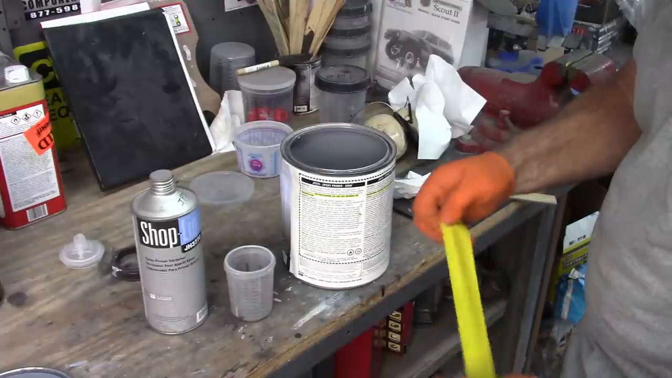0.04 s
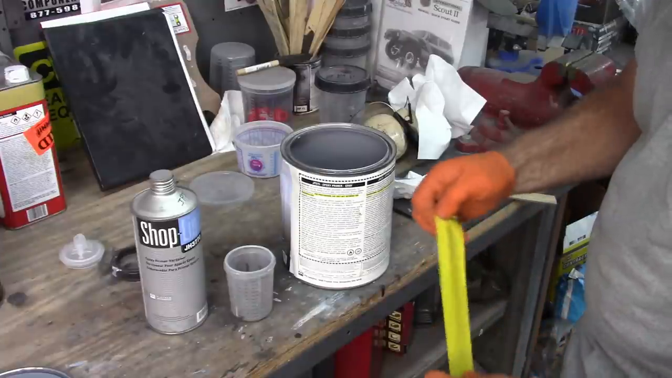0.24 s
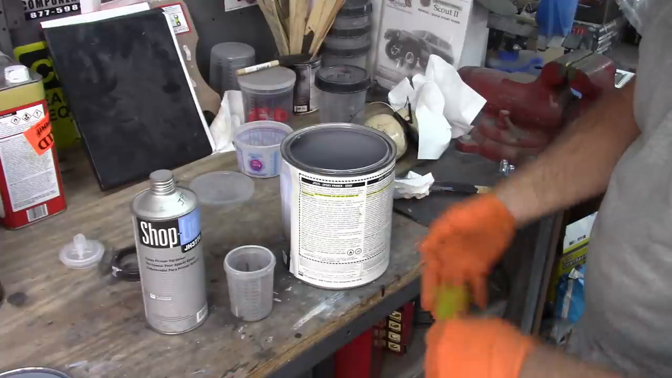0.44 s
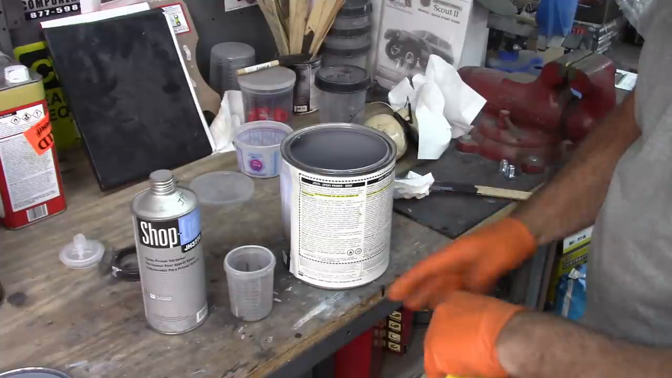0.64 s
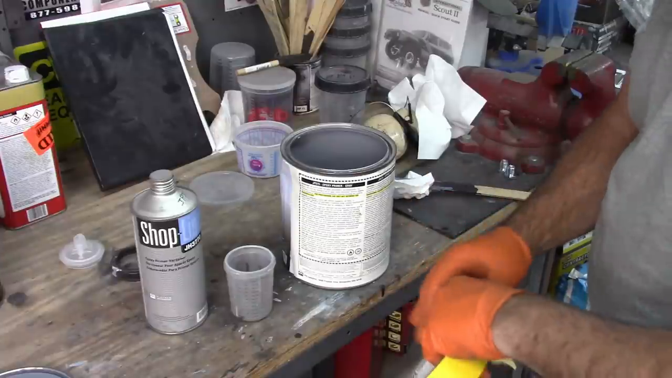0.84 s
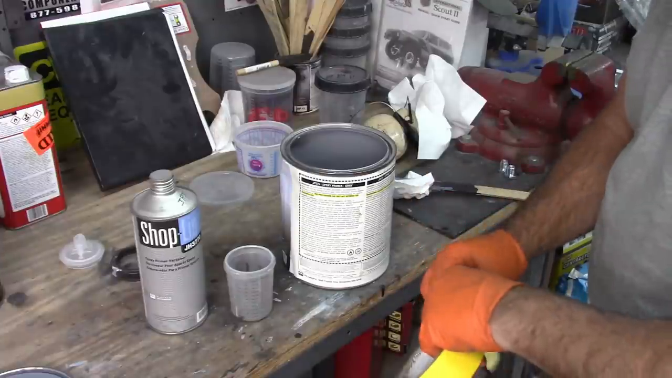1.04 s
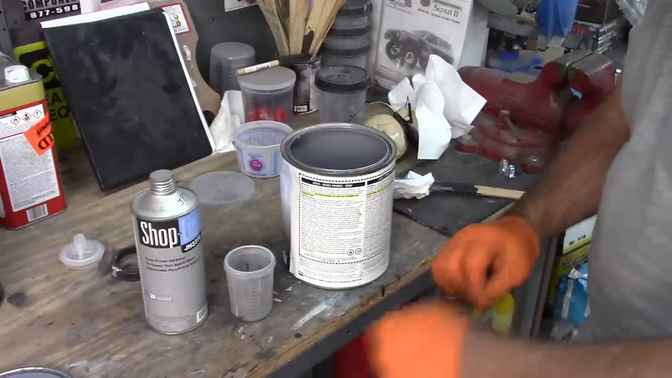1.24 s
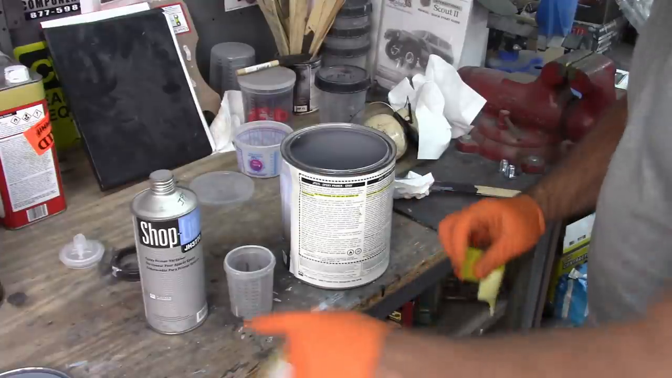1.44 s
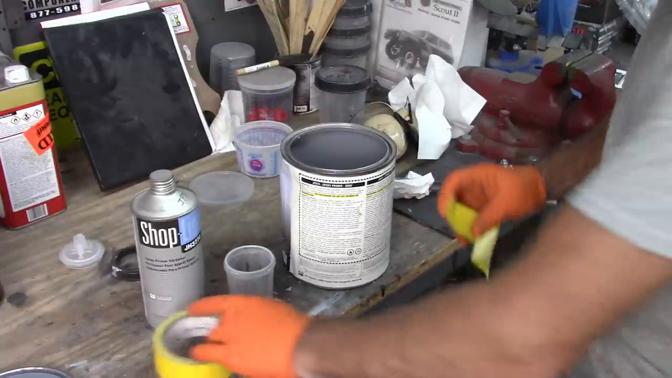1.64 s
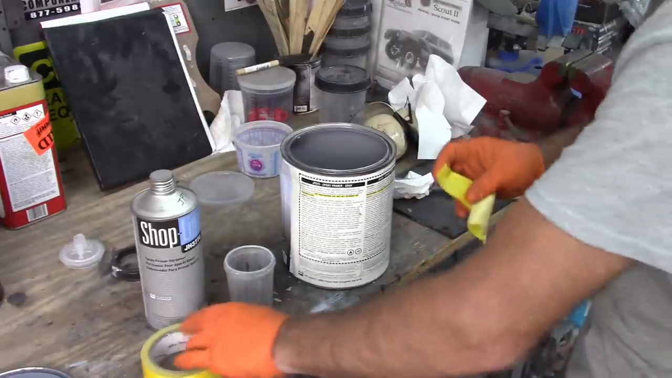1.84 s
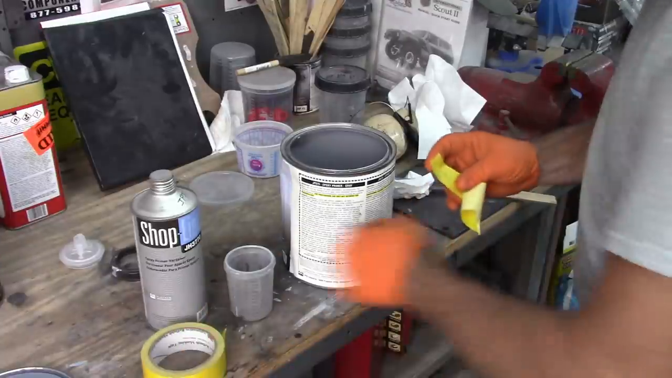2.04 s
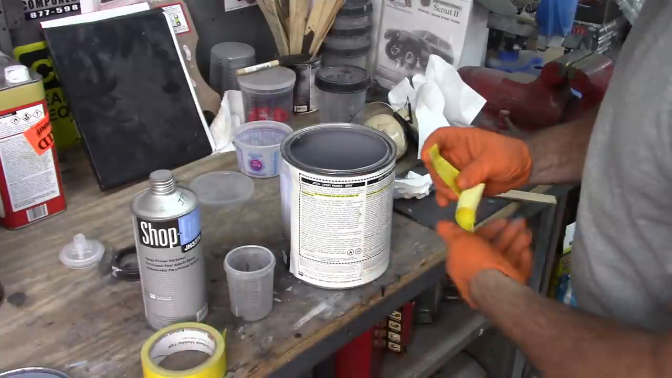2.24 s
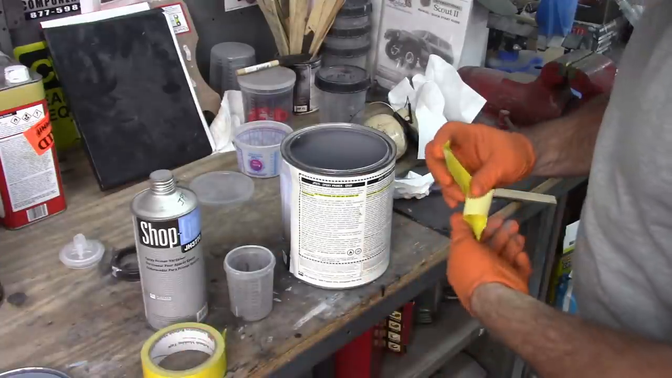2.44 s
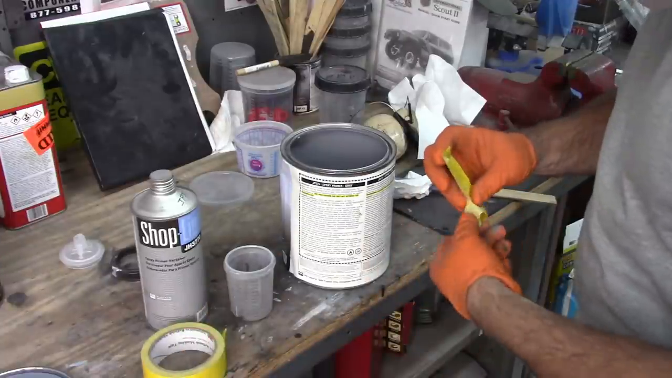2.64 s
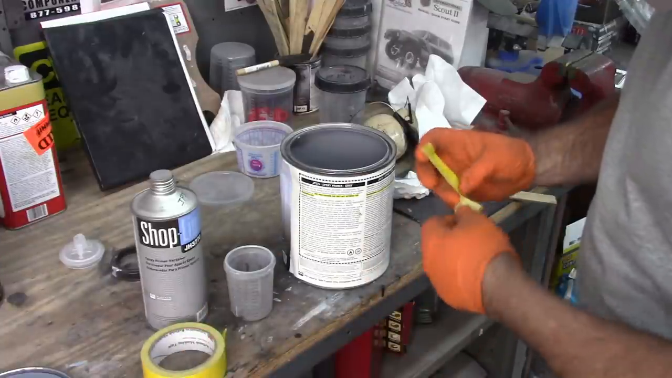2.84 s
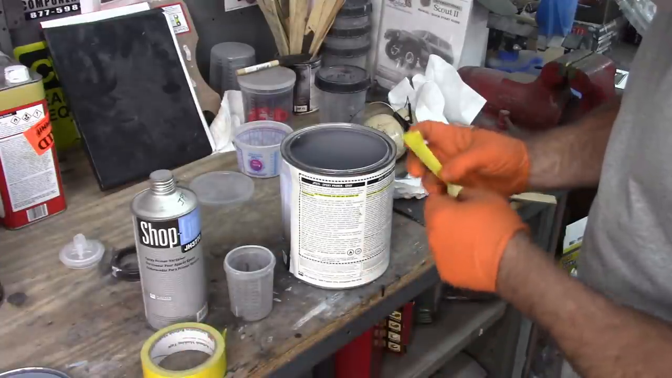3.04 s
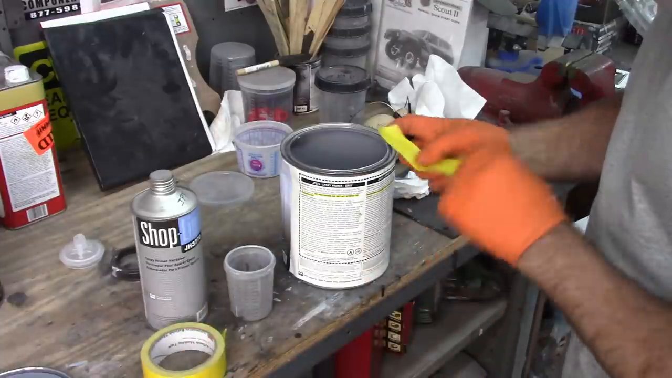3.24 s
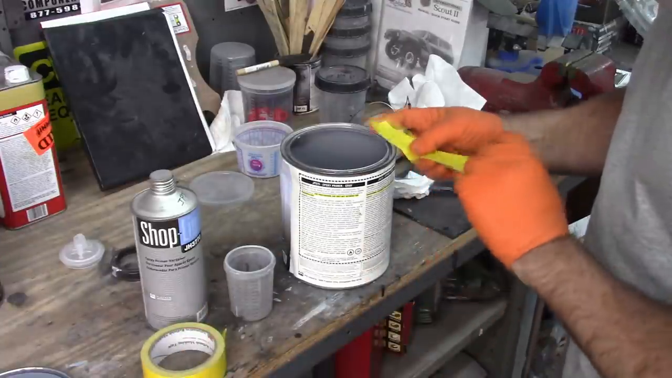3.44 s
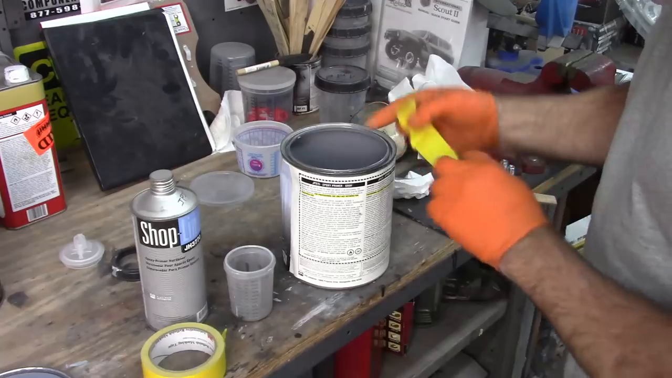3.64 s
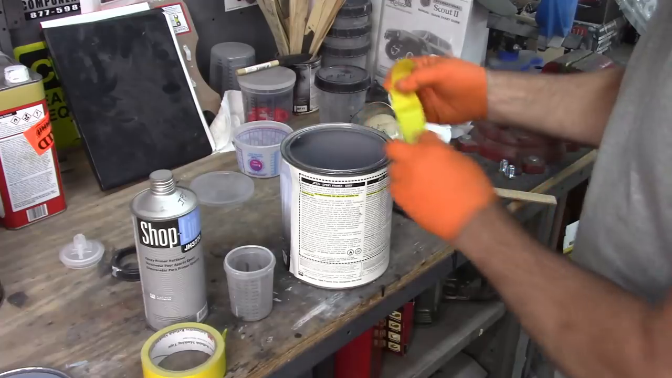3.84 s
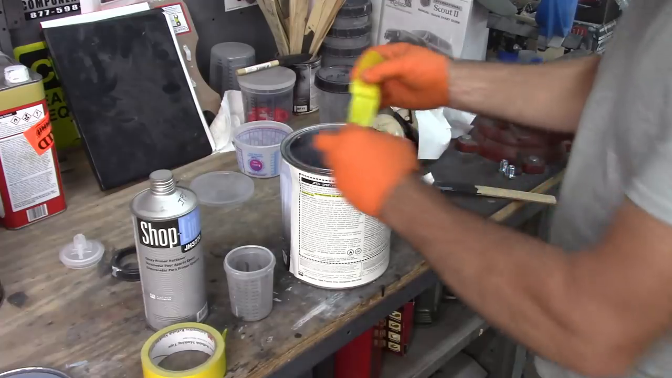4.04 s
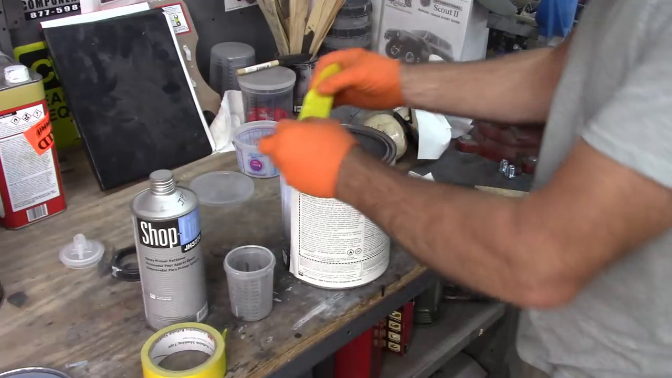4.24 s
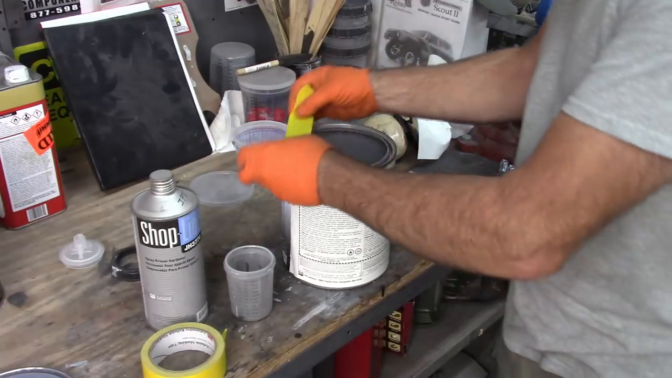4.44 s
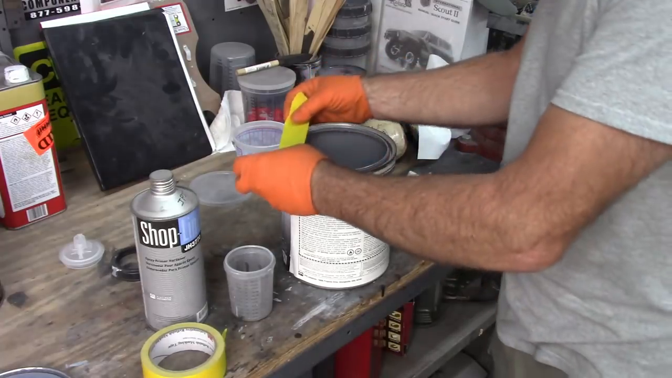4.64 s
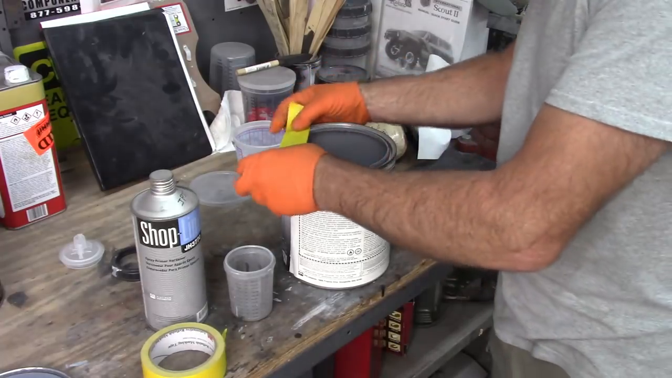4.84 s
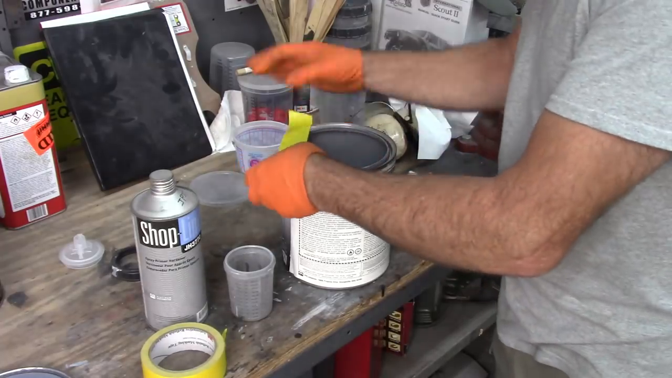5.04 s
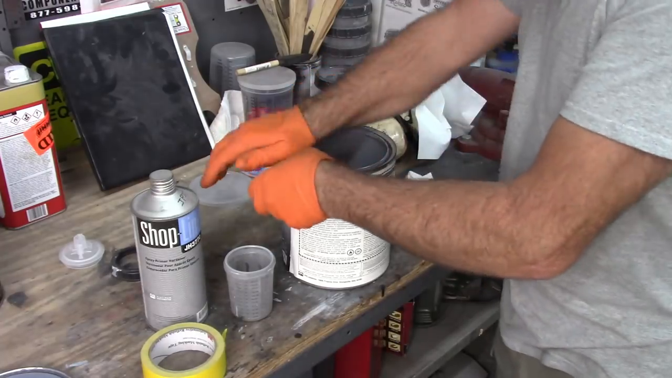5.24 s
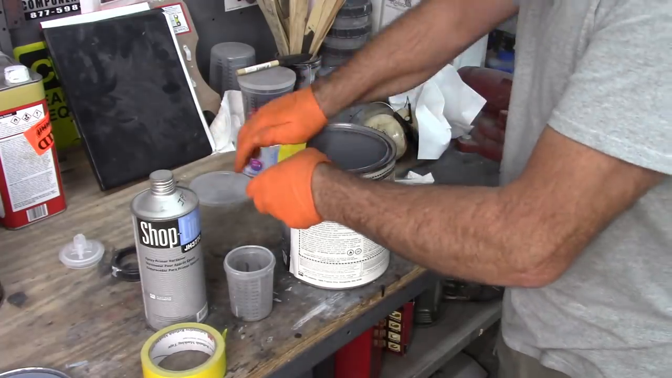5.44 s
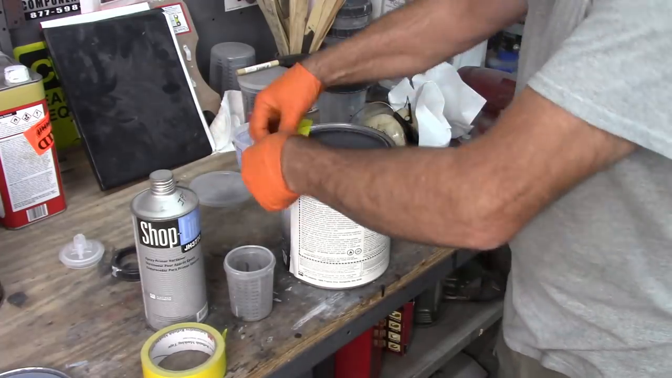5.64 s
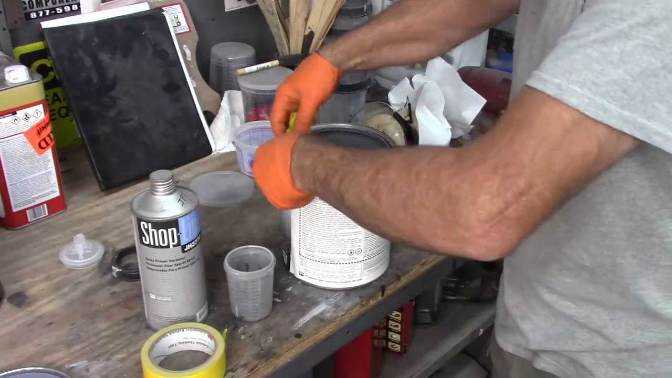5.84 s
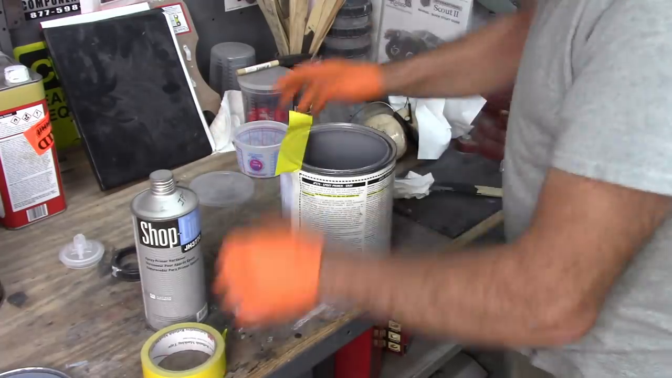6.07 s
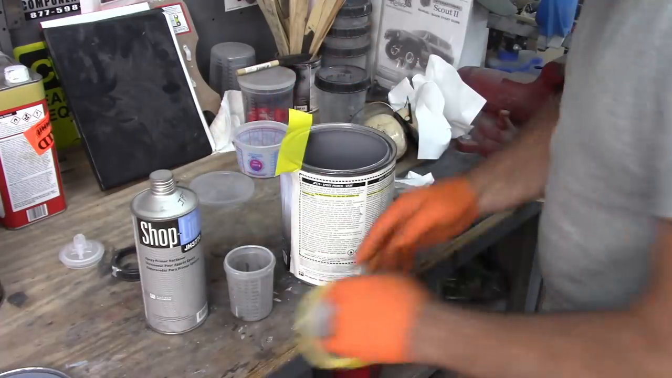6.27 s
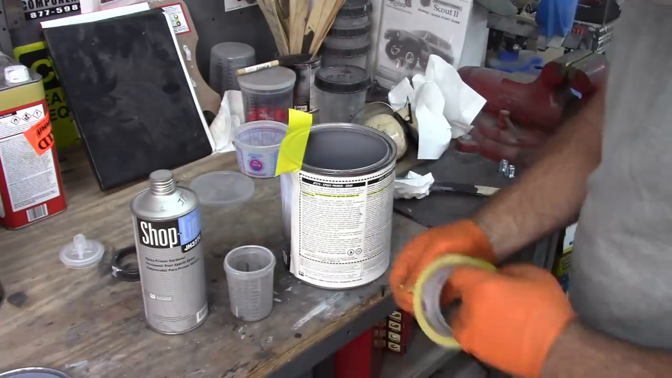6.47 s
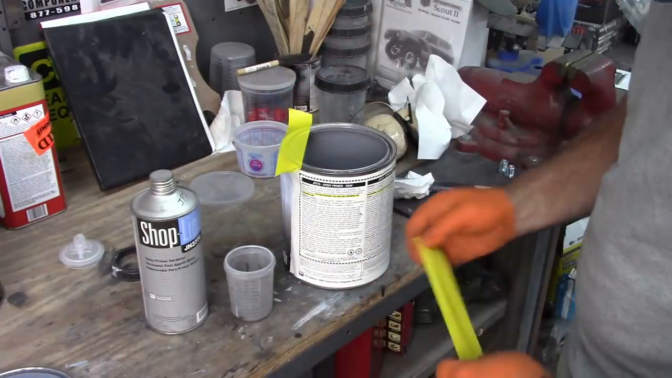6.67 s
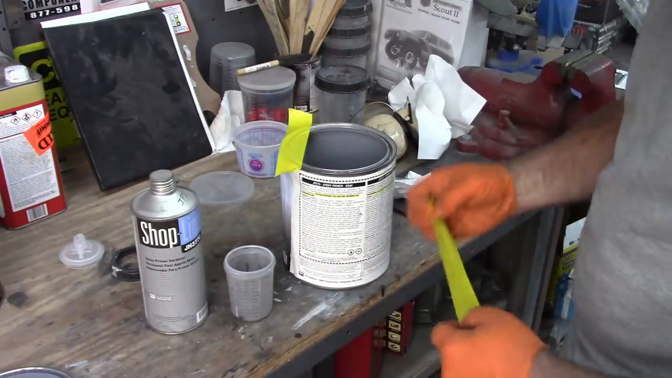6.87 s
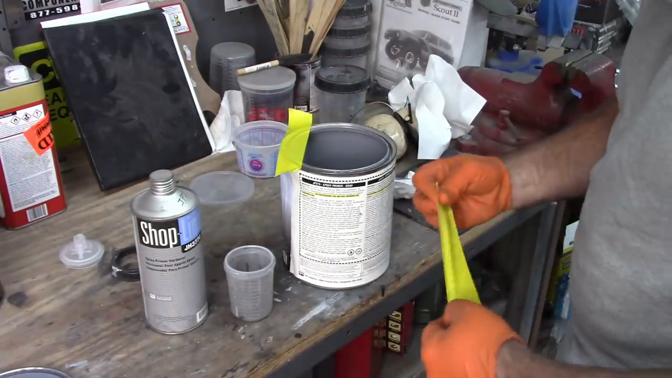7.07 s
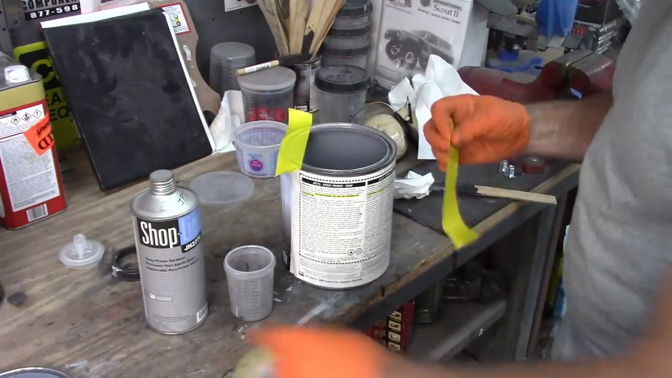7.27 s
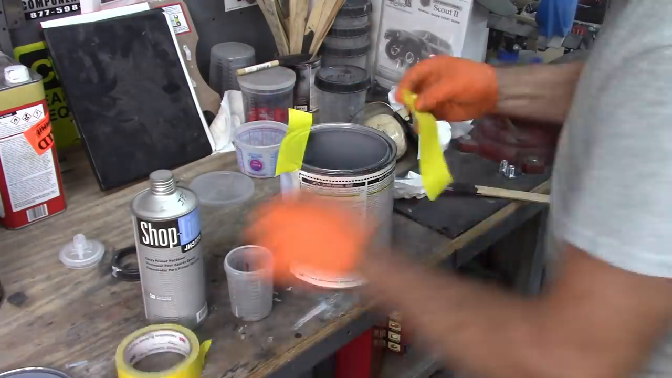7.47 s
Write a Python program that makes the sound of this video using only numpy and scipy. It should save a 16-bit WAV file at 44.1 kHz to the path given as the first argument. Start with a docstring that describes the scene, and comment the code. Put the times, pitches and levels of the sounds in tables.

```python
"""Masking tape at a garage workbench, heard close up in a small cluttered room over a faint hush.
Strips are jerked off the roll in stick-slip noise that drums and rasps; the roll knocks on the wooden top.
Before and after the knock, gloved fingers crinkle a strip and rub it onto a paint can: crease clicks,
friction grains and rustle. The nearly mono image turns wide all at once near 4.8 s; a few short pulls and
tears follow, and at the end the roll knocks again, softly."""
import sys
import numpy as np
from scipy import signal
from scipy.fft import rfft, irfft, next_fast_len
from scipy.io import wavfile
from scipy.ndimage import uniform_filter1d, minimum_filter1d, map_coordinates

SR = 44100
rng = np.random.default_rng(int(sys.argv[2]) if len(sys.argv) > 2 else 0)


def wrap_up_sound(samples):
    """Save the sound to the file named by the first command line argument, as 16-bit audio."""
    columns = np.atleast_2d(samples).T
    # keep every value between -1 and 1, then stretch to whole-number steps
    tamed = np.clip(columns, -1, 1)
    steps = np.round(tamed * 32767).astype(np.int16)
    wavfile.write(sys.argv[1], SR, steps)


N = 331191  # length in samples

# The paper backing buckles: start_s, relative level_db, crumple_s, knock_db (low end), treble_db
BUCKLES = [(0.46, -15, 0.018, -6.5, -1.5), (1.19, -20, 0.038, -0.5, -6), (1.421, -19.5, 0.019, -8, 0.5),
           (1.465, -27, 0.0042, 1, -4.5), (2.043, -30, .01, -8, -6.5), (2.097, -27.5, .01, -18, -8),
           (2.411, -35.5, 0.01, -9.5, 9), (2.442, -24.5, 0.0063, 0.5, 6), (2.447, -20, 0.022, 3, -2.5),
           (2.684, -26.5, 0.0065, 7, -5), (2.836, -22.5, 0.027, -3, -2), (2.973, -19, 0.021, -3, 3),
           (3.102, -12, 0.02, -9, 0.5), (3.233, -32.5, 0.0068, -7, -5), (3.26, -32, .022, -1.5, -2.5),
           (3.474, -9.5, 0.013, -13, -2.5), (3.598, -35, .012, -22, 8), (3.628, -30.5, 0.014, -15, 6),
           (3.818, -42, .012, -10, 3), (3.943, -39.5, 0.019, 13, 3), (4.08, -29, .025, 3.5, 1.5),
           (4.19, -35, 0.012, 3, -2.5), (5.018, -40, 0.013, 10, 3), (6.841, -18.5, 0.0069, 10.5, -6),
           (7.387, -21.5, 0.009, -15, -4.5)]
# Spectrum of sliding paper: freq_hz, relative density_db per Hz
SLIDING_PAPER = [(150, -39), (250, -8), (451, -2), (565, -4), (1190, -4), (1350, -0.5), (1660, -1.5),
                 (3200, -2), (5030, -11), (5780, -4.5), (6750, -4), (10600, -10.5), (14500, -25.5),
                 (15800, -34)]


def amp(db):
    """Decibels to gain."""
    return 10 ** (np.asarray(db) / 20)


def unit(x):
    """Scale to rms 1."""
    return x / np.sqrt(np.mean(x ** 2) + 1e-20)


def along(points, hz):
    """Read (Hz, value) points on a log frequency axis."""
    f, v = np.transpose(points)
    return np.interp(np.log(hz + 1), np.log(f + 1), v)


def curve(rows):
    """Turn (s, value) rows into one value per sample."""
    return np.interp(np.arange(N) / SR, *np.transpose(rows))


def wobble(rate, size):
    """A smooth random curve with rate knots a second."""
    return map_coordinates(rng.standard_normal(2048), [np.arange(size) * rate / SR], mode="wrap")


def colour(x, gain_db):
    """Causal minimum-phase filter whose gain in dB is a function of frequency."""
    n = x.shape[-1]
    m = 2 * next_fast_len(n // 2 + 2048)
    cepstrum = irfft(np.log(amp(gain_db(np.fft.rfftfreq(m, 1 / SR))) + 1e-6))
    # folding the cepstrum forward makes the filter causal
    cepstrum[1:m // 2] *= 2
    cepstrum[m // 2 + 1:] = 0
    return irfft(rfft(x, m) * np.exp(rfft(cepstrum)), m)[..., :n]


def peak(hz, centre_hz, q):
    """Bell of a resonance, 1 at its centre."""
    return 1 / (1 + (q * (hz / centre_hz - centre_hz / (hz + 1))) ** 2)


def shelf(hz, edge_hz):
    """0 well below the edge, 1 well above."""
    return hz ** 4 / (hz ** 4 + edge_hz ** 4)


def crackle(spread_db, size):
    """Dense micro-snaps of very unequal size, rms 1."""
    sizes_db = spread_db * np.clip(rng.standard_normal(size), -3, 3)
    return unit(rng.standard_normal(size) * amp(sizes_db))


def stroke(t, hold, rise, fall):
    """Gain of a hand movement: 20 dB up over rise, held, 20 dB down over fall."""
    before = np.maximum(-t, 0) / rise
    after = np.maximum(t - hold, 0) / fall
    return amp(-20 * (before + after))


def add(track, s, sound):
    """Mix a sound into the track from time s on."""
    start = round(s * SR)
    part = sound[max(-start, 0):max(N - start, 0)]
    track[max(start, 0):][:len(part)] += part


def rips(jitter=.25, size_db=2.5, ripple_db=4.0, drum_q=5):
    """Glue threads snap in stick-slip bursts; the taut strip rings evenly and drums at its lowest mode."""
    # pulls and tears: start_s, hold_s, level_db, strip_hz (ripple spacing), drum_hz, drum_db (re rasp)
    pulls = [(.002, 0.061, -16, 587, 248, -15), (0.184, 0.038, -39.5, 513, 171, -10),
             (1.209, 0.022, -28, 810, 350, -21.5), (6.614, .024, -19, 1198, 340, -15),
             (6.731, .014, -20, 690, 254, -13.5), (6.833, 0.0086, -26, 585, 261, -21),
             (7.217, .010, -29, 1110, 345, -23.5)]
    # spectrum of snapping glue: freq_hz, relative density_db per Hz
    peel = [(59, -41.5), (100, -23), (271, -8.5), (732, -5.5), (886, -10.5), (1190, -2), (1470, -7),
            (1900, -1.5), (2670, -4), (3740, -9.5), (4720, -16.5), (6090, -7.5), (6920, -8.5), (8550, -7.5),
            (15800, -30)]
    rise_s, fall_s, ease = .006, .013, .45  # ease: share of the hold added to both ramps
    slip_rate_hz, slip_slows_s = 367.8, 0.057  # a long pull slips more slowly
    jerky_s = 0.072  # a pull held this long is fully jerky
    gentle_db, gentle_treble = -21, 0.06  # below this level a pull gains treble, dB per dB
    sag_per_s, drum_lag_s = 3.8, 0.0091  # the drum builds a little late
    bass_edge = .68  # below this share of its drum pitch the strip radiates little
    body_hz, body_base_db, body_db_per_s = 950, -4, 86.5  # a longer pull has more middle range

    out, t = np.zeros(N), np.arange(-SR // 10, SR // 5) / SR
    for s, hold, db, strip_hz, drum_hz, drum_db in pulls:
        rise, fall = rise_s + ease * hold, fall_s + ease * hold

        # each slip starts a burst of its own size, which dies away before the next
        slip_hz = slip_rate_hz * np.exp(-hold / slip_slows_s)
        slips = np.cumsum(slip_hz * np.exp(jitter * wobble(200, size=len(t)))) / SR
        sizes = amp(size_db * rng.standard_normal(512))[slips.astype(int) % 512]
        bursts = unit(sizes * np.exp(-(slips % 1) / .24))
        jerky = np.clip(hold / jerky_s, 0, 1)
        threads = crackle(spread_db=2.5, size=len(t)) * np.sqrt(jerky * bursts ** 2 + 1 - jerky)

        treble_db = gentle_treble * (gentle_db - db)
        body_db = body_base_db + body_db_per_s * hold
        ripple = lambda hz: ripple_db * np.cos(2 * np.pi * hz / strip_hz) * (1 - shelf(hz, edge_hz=1500))
        bass_cut = lambda hz: 20 * np.log10(shelf(hz, bass_edge * drum_hz) + .08)
        tone = lambda hz: (along(peel, hz) + ripple(hz) + body_db * peak(hz, body_hz, q=1.3)
                           + bass_cut(hz) + treble_db * shelf(hz, edge_hz=2500))
        rasp = unit(colour(threads, tone))

        drum = unit(colour(threads, lambda hz: 20 * np.log10(peak(hz, drum_hz, drum_q) + 1e-6)))
        # the pitch sinks as the strip lengthens: the drum is read ever more slowly
        read_s = hold + (1 - np.exp(-sag_per_s * (t - hold))) / sag_per_s
        drum = np.interp(read_s, t, drum)

        pull = rasp * stroke(t, hold, rise, fall)
        pull = pull + amp(drum_db) * drum * stroke(t - drum_lag_s, hold, rise, fall)
        add(out, s + t[0], amp(db) * pull)
    return out


def snaps(rise=0.0031, level_db=-22, click_db=-1):
    """A crease strains, flips with a click and crumples briefly, ringing at its own pitch."""
    # spectrum of creasing paper: freq_hz, relative density_db per Hz
    crease = [(88, -55), (150, -18.5), (713, -3), (1280, -9), (1620, -3.5), (2390, -6.5), (2790, -6.5),
              (3590, -2.5), (4540, -10), (5410, -7), (6700, -0.5), (13000, -19.5), (15800, -28.5)]
    out, t = np.zeros(N), np.arange(SR // 12) / SR
    click = np.arange(len(t)) == round(rise * SR)
    for s, db, length, knock_db, treble_db in BUCKLES:
        # a crisper crease rings higher, and less clearly
        crease_hz = 3100 + 68.5 * treble_db
        crease_db = 3 - 2.1 * treble_db
        crumple = crackle(spread_db=4.0, size=len(t)) * stroke(t - rise, 0, rise, max(length, .001))
        flip = crumple / np.linalg.norm(crumple) + amp(click_db) * click
        tone = lambda hz: (along(crease, hz) + crease_db * peak(hz, crease_hz, q=4)
                           + knock_db * (1 - shelf(hz, edge_hz=1600)) + treble_db * shelf(hz, edge_hz=2700))
        add(out, s, amp(db + level_db) * unit(colour(flip, tone)))
    return out


def rubs(ripple_db=3, drag_treble_db=-2):
    """Fine friction grains of sliding strokes and of drag around crisp snaps; each grip colours them anew."""
    # tape and gloves slide, on each other and on the can: start_s, hold_s, level_db, treble_db
    strokes = [(0.277, 0.0084, -52.5, 5), (.425, 0.036, -43, -5.5), (0.704, 0.0091, -56.5, -3),
               (1.041, 0.066, -58.5, -8), (1.24, .04, -47.5, -5.5), (1.539, 0.024, -45, 3),
               (2.649, 0.0065, -44.5, -7), (3.27, 0.091, -47.5, -3), (3.678, 0.04, -47, 0),
               (4.33, 0.022, -49, 2.5), (4.898, 0.0097, -43, 2), (5.048, 0.0062, -49, 10),
               (5.343, 0.035, -59, -8), (5.409, 0.058, -50.5, -7), (5.601, 0.0097, -58.5, -6),
               (5.766, 0.027, -54, -10.5), (6.07, 0.023, -59.5, -7), (6.322, 0.026, -65.5, 6.5),
               (6.533, 0.043, -47.5, -0.5), (6.995, 0.0095, -52, -14.5), (7.383, .015, -47.5, 0.5),
               (7.481, 0.0045, -34.5, -15)]
    rise_s, fall_s, ease = 0.0085, .018, 0.46  # ease: share of the hold added to both ramps
    drag_db, drag_grows = -30.5, 0.8  # level beside a snap of 0 dB, and its growth in dB per dB
    drag_rise_s, drag_fall_s = 0.048, 0.039
    crisp_db = -5  # snaps with no more treble than this come without drag

    out, t = np.zeros(N), np.arange(-SR // 4, SR // 4) / SR
    slides = [(s, hold, db, rise_s + ease * hold, fall_s + ease * hold, treble_db)
              for s, hold, db, treble_db in strokes]
    drags = [(s, 0, drag_db + drag_grows * db, drag_rise_s, drag_fall_s, drag_treble_db)
             for s, db, *_, treble_db in BUCKLES if treble_db > crisp_db]
    for s, hold, db, rise, fall, treble_db in slides + drags:
        grip_hz = rng.uniform(1400, 3400)  # spacing of the ripples in the spectrum
        grains = crackle(spread_db=6, size=len(t)) * amp(2.5 * wobble(220, size=len(t)))
        ripple = lambda hz: ripple_db * np.cos(2 * np.pi * hz / grip_hz) * shelf(hz, edge_hz=965)
        tone = lambda hz: along(SLIDING_PAPER, hz) + treble_db * shelf(hz, edge_hz=3400) + ripple(hz)
        friction = unit(colour(grains, tone))
        add(out, s + t[0], amp(db) * friction * stroke(t, hold, rise, fall))
    return out


def rustle(level_db=-2, paper_hz=3000, paper_db=5, thin_db=-8, crinkle_hz=110, crinkle_db=-5.0,
           body_swing_db=4.0, edge_swing_db=4.0):
    """Handled crepe paper whispers in clumps with tiny crinkles; body and crisp edge swell separately."""
    # the strip in the fingers: time_s, relative level_db
    handling = [(0.3, -55), (0.72, -64.5), (1.1, -72), (1.38, -45), (1.6, -62), (2.02, -59.5), (2.3, -62),
                (3.51, -50), (3.59, -50), (3.73, -58.5), (4.95, -76), (6.41, -69), (6.54, -58), (6.72, -75),
                (6.96, -84), (7.22, -73), (7.38, -58.5), (7.5, -74.5)]
    whisper = unit(crackle(spread_db=5, size=N) * amp(2 * wobble(70, size=N)))
    # sparse random clicks, crinkle_hz a second on average
    crinkles = unit((rng.random(N) < crinkle_hz / SR) * rng.standard_normal(N))
    tone = lambda hz: (along(SLIDING_PAPER, hz) + paper_db * peak(hz, paper_hz, q=1.4)
                       + thin_db * (1 - shelf(hz, edge_hz=2200)))
    paper = unit(colour(whisper + amp(crinkle_db) * crinkles, tone))
    body = signal.sosfiltfilt(signal.butter(2, 4800, fs=SR, output="sos"), paper)
    edge = paper - body
    body = body * amp(body_swing_db * wobble(7.9, size=N))
    edge = edge * amp(edge_swing_db * wobble(21, size=N))
    return amp(level_db + curve(handling)) * (body + edge)


def knocks(thud_t60=0.047, thud_db=-23, ring_db=-21):
    """The cardboard core hits the wood: a dull thud, and roll and bench ring briefly in decaying modes."""
    # the roll meets the bench and rocks: start_s, relative level_db
    hits = [(1.7536, -2.5), (1.759, -15.5), (1.777, -17), (1.790, -24.5), (1.803, -22), (1.814, -23.5),
            (7.483, -25), (7.494, -18.5)]
    # modes of roll and bench top: freq_hz, relative level_db, t60_s
    modes = [(234, -14.5, 0.12), (357, -7, 0.051), (562.6, -4, 0.044), (690, 3.5, .05), (888, 2.5, 0.046),
             (997.6, 2, 0.074), (1324, 6, 0.02), (1614, 4, 0.03), (2176, -11, 0.027), (2520, -10, 0.035),
             (3202, -16, 0.027)]
    # spectrum of the thud: freq_hz, relative density_db per Hz
    thud_spectrum = [(35, -55), (60, -24), (448, -2), (648, -2.5), (1330, -4), (1630, -4.5), (1920, -6),
                     (2420, -15.5), (2780, -20.5), (3340, -21.5), (4620, -41), (6530, -36), (15000, -69)]
    out, t = np.zeros(N), np.arange(SR // 2) / SR
    for s, db in hits:
        ring = np.zeros(len(t))
        for k, (hz, level, t60) in enumerate(modes):
            fade = amp(level + rng.normal(0, 0.5) - 60 * t / t60)  # no two hits ring quite alike
            ring += (-1) ** k * fade * np.sin(2 * np.pi * hz * t)
        burst = rng.standard_normal(len(t)) * amp(-60 * t / thud_t60)
        thud = colour(burst, lambda hz: along(thud_spectrum, hz))
        add(out, s, amp(db) * (amp(thud_db) * unit(thud) + amp(ring_db) * unit(ring)))
    return out


def nearby(x):
    """Surfaces within arm's reach throw back a few quick echoes."""
    # echoes off bench, cans and body: delay_s, level_db
    echoes = [(.0028, -26.5), (.0057, -17.5), (.0093, -16.5)]
    out = x.copy()
    for delay, db in echoes:
        add(out, delay, amp(db) * x)
    return out


def spread(x):
    """Direct sound as (mid, side): scattering off the clutter shifts the phase between the capsules."""
    t = np.arange(-SR // 200, SR // 200 + 1) / SR
    scatter = rng.standard_normal(len(t)) * amp(-60 * np.abs(t) / .012)
    scatter = scatter - scatter[::-1]  # odd: both ears stay equally loud
    side = signal.fftconvolve(x, scatter / np.linalg.norm(scatter), "same")
    return np.array([x, side])


def garage(x):
    """The room's tail as (mid, side): shaped noise in which each frequency dies at its own speed."""
    # decay of the room: freq_hz, t60_s
    decay = [(150, 0.85), (500, 0.34), (1400, 0.46), (3500, 0.27), (7000, 0.82), (14000, 0.067)]
    # what the walls give back: freq_hz, relative level_db
    walls = [(100, 0), (400, 3.5), (1500, -4.5), (3500, 4.5), (8000, -15), (15000, 5)]
    hz, t, z = signal.stft(rng.standard_normal((2, SR // 2)), SR, nperseg=256)
    fade = amp(-60 * t / along(decay, hz)[:, None]) * (1 - np.exp(-t / 0.007))
    shaped = z * fade * amp(along(walls, hz))[:, None]
    tail = signal.istft(shaped, SR, nperseg=256)[1]
    return signal.fftconvolve(x[None], tail / np.linalg.norm(tail[0]), axes=1)[:, :N]


def hush(side_db=-64, boom_hz=450, boom_db=-8):
    """Low air noise of the garage as (mid, side); a narrow band of it wavers."""
    # spectrum of the middle: freq_hz, relative density_db per Hz
    mid_spectrum = [(15, -48.5), (25, -18), (50, -13), (75, 2), (100, -1.5), (316, 3.5), (461, 2.5),
                    (604, 1.5), (1090, -6), (1220, -5.5), (1320, -7), (1780, -8), (2030, -9), (4210, -15.5),
                    (6310, -19.5), (13400, -31.5), (15800, -46)]
    # spectrum of the side: freq_hz, relative density_db per Hz
    side_spectrum = [(15, -40), (25, -19), (299, 4.5), (333, 8), (527, -1.5), (710, 0.5), (981, -5),
                     (7830, -22.5), (12400, -36), (15800, -46.5)]
    # level of the middle before its slight wavering: time_s, level_db
    mid_level = [(0, -58.5), (2.4, -59), (3.95, -56), (4.85, -62), (6.1, -63), (7.5, -64.5)]
    air = unit(colour(rng.standard_normal(N), lambda hz: along(mid_spectrum, hz)))
    boom_tone = lambda hz: 20 * np.log10(peak(hz, boom_hz, q=4) + 1e-6)
    boom = unit(colour(rng.standard_normal(N), boom_tone))
    mid = air + amp(boom_db + 3 * wobble(10, size=N)) * boom
    mid = mid * amp(curve(mid_level) + .9 * wobble(5, size=N))
    side = amp(side_db) * unit(colour(rng.standard_normal(N), lambda hz: along(side_spectrum, hz)))
    return np.array([mid, side])


def scene():
    """Tape and roll near the microphones, in the room; such small things radiate little bass."""
    # the nearly mono image turns wide all at once near 4.8 s: time_s, direct_side_db, room_side_db
    width = [(4.749, -27.5, -23.5), (4.8, -4, -3.5)]
    no_bass = lambda x, edge_hz: colour(x, lambda hz: 20 * np.log10(shelf(hz, edge_hz) + 0.014))
    tape = nearby(no_bass(rips() + snaps() + rubs() + rustle(), edge_hz=35))
    roll = no_bass(knocks(), edge_hz=140)
    near = spread(tape + roll)
    room = amp(-20.0) * garage(tape) + amp(-14.5) * garage(roll)
    air = hush()

    s, near_db, room_db = np.transpose(width)
    near_side = near[1] * amp(curve(np.c_[s, near_db]))
    room_side = room[1] * amp(curve(np.c_[s, room_db]))
    mid = near[0] + room[0] + air[0]
    side = near_side + room_side + air[1]
    return np.array([mid + side, mid - side])


def record(dry):
    """A limiter ducks the highest peaks on both channels alike, and nothing above a band limit is kept."""
    ceiling, limit_s, top_hz = .88, .004, 15950  # full scale is 1
    span = round(limit_s * SR)
    needed = ceiling / np.maximum(np.abs(dry).max(axis=0), ceiling)
    limited = dry * uniform_filter1d(minimum_filter1d(needed, span), span)
    m = next_fast_len(N + SR // 2)
    kept = np.fft.rfftfreq(m, 1 / SR) < top_hz
    return irfft(rfft(limited, m) * kept, m)[:, :N]


dry = scene()
out = record(dry)
wrap_up_sound(out)
```